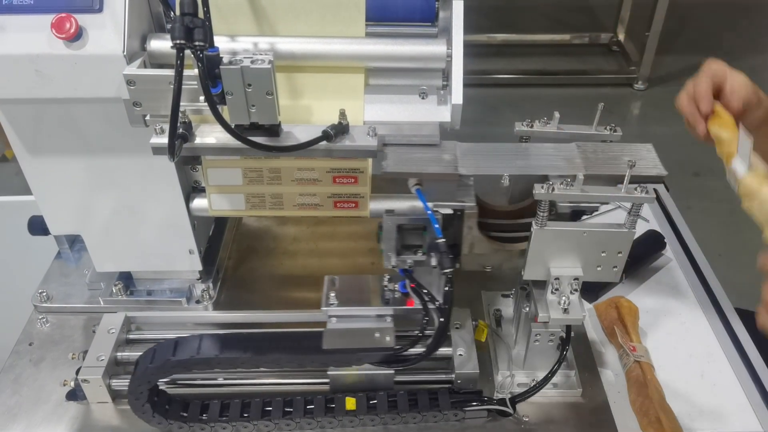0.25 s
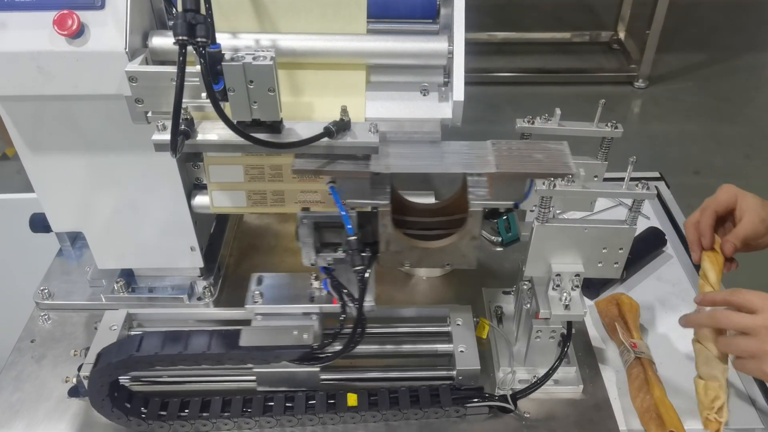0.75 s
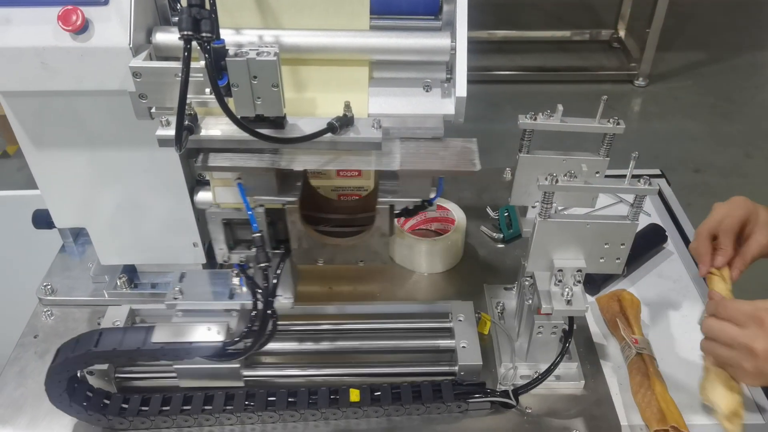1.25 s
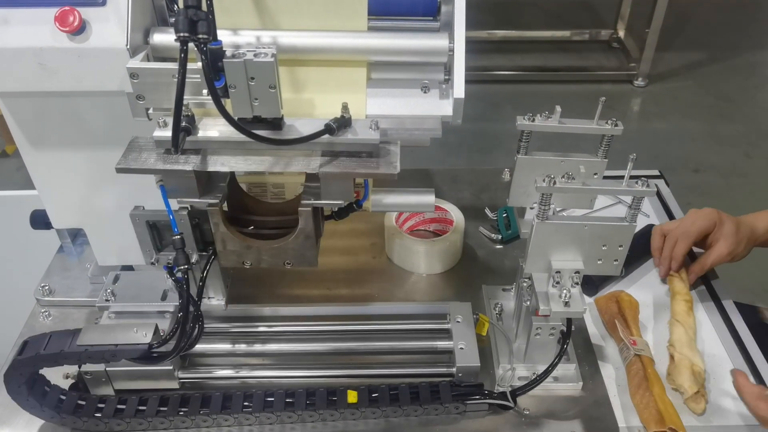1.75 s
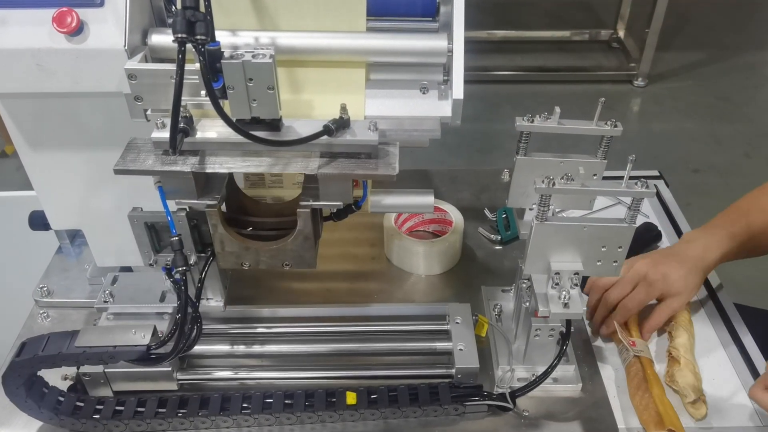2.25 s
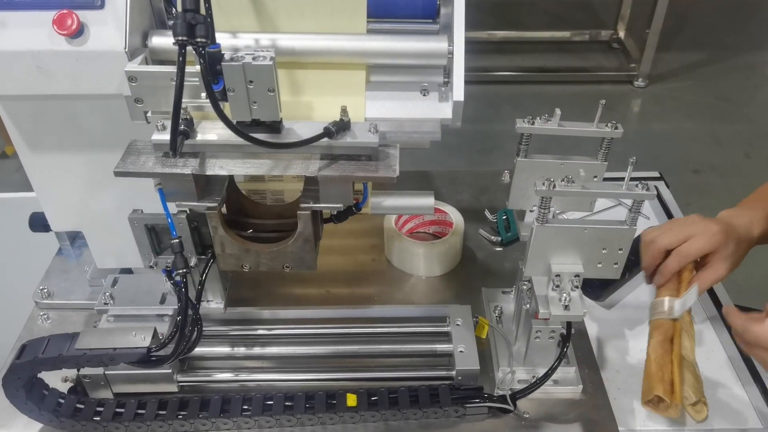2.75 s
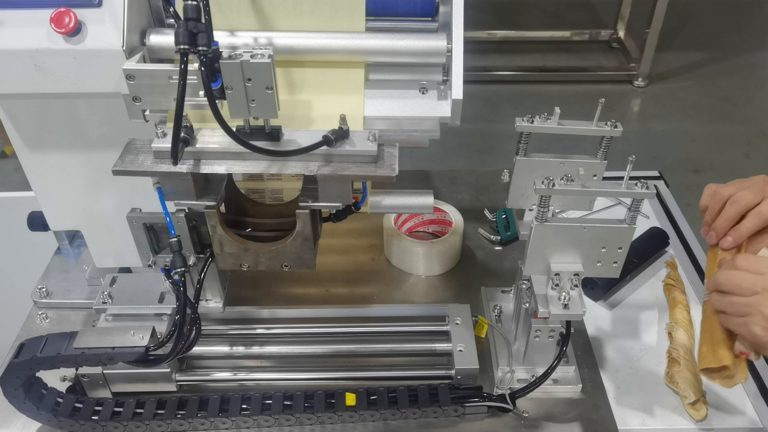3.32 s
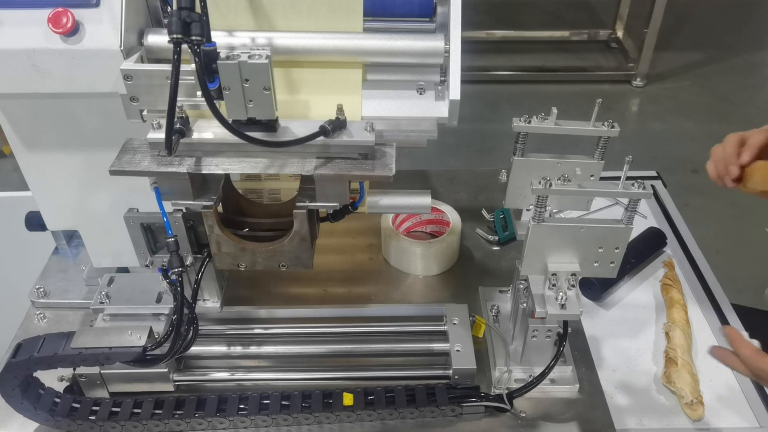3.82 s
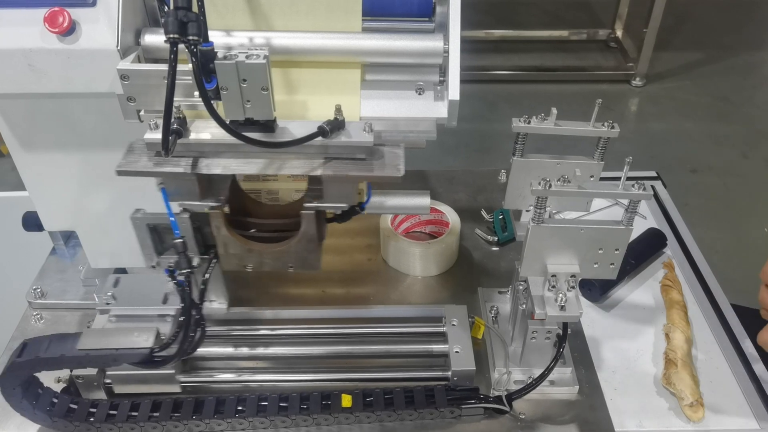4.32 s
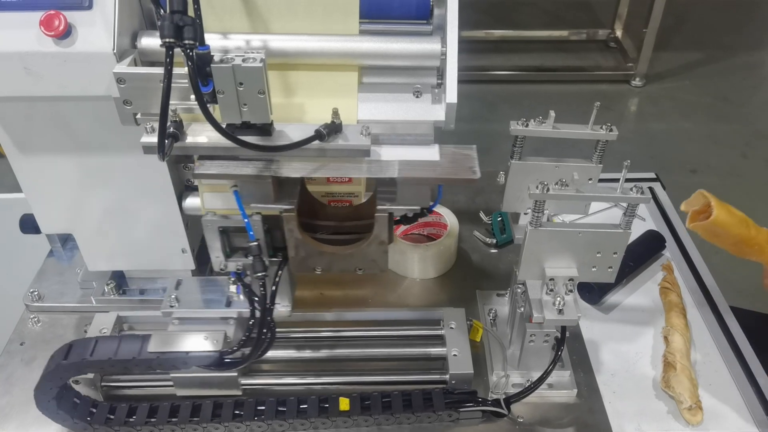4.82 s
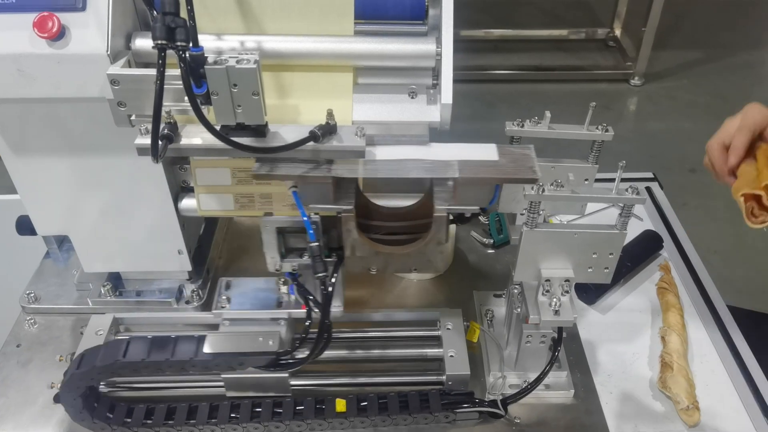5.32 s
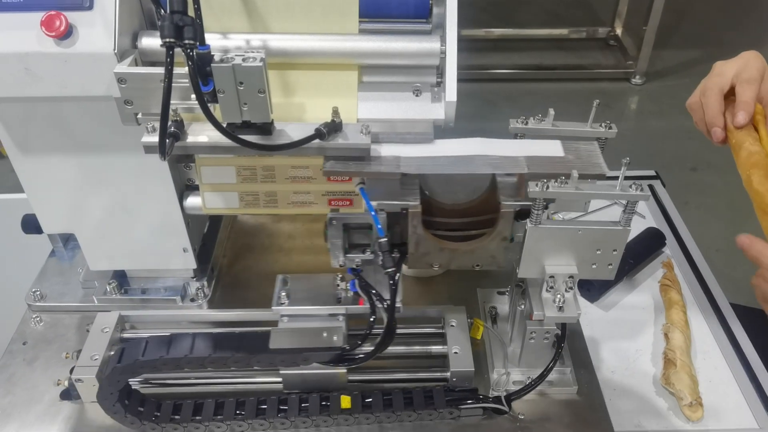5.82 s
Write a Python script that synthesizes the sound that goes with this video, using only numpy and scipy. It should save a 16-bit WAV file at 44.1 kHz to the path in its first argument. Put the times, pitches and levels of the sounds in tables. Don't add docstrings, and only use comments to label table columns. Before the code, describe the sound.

A small, close stereo microphone in a hard, echoing workshop hears steady low plant rumble and faint wavering drive whines. At 0 s a high metal ring around 5 kHz flutters away under a short fading hiss. Light chain clicks come at 0.55 and cluster near 0.9, with a thin puff. Valve snaps and puffs follow at 1.2 and 1.4. At 1.57 a cylinder slams with rattling after-knocks and a sharp snap; suction then hisses steadily until 2.78, with clicks around 1.84, 2.1, 2.35 and 2.45-2.57. At 2.78 a knock and hard snap open a bright, rough air jet, the loudest event, leaning left, while the background ducks. It shuts near 3.3 with a low thump; exhaust dies quickly, with soft knocks until 3.4. From 3.7 thin leak hiss continues to the 6 s end, with chain clicks near 3.8, 4.05-4.35, 5.0, 5.27 and 5.75 as background slowly rises.

```python
import sys
import numpy as np
from scipy import signal
from scipy.fft import rfft, irfft, next_fast_len
from scipy.io import wavfile
from scipy.ndimage import uniform_filter1d

SR = 44100
rng = np.random.default_rng(int(sys.argv[2]) if len(sys.argv) > 2 else 0)


def ratio_of_db(decibels):
    return 10 ** (np.asarray(decibels, float) / 20)


def unload_audio(sound):
    columns = np.transpose(np.atleast_2d(sound))
    steps = np.round(np.clip(columns, -1, 1) * 32767)
    wavfile.write(sys.argv[1], SR, steps.astype(np.int16))


N = 267687
SIZE = next_fast_len(N, True)
TIME_S = np.arange(N) / SR
HZ = np.fft.rfftfreq(SIZE, 1 / SR) + 1e-3


def at_hz(points, hz):
    points_hz, values = np.array(points).T
    return np.interp(np.log(hz), np.log(points_hz), values)


def lean(db):
    return ratio_of_db(np.multiply.outer([0.5, -0.5], db))


def since(s):
    return np.maximum(TIME_S - s, 0)


def gate(start_s, stop_s, attack_s, release_s):
    return np.interp(TIME_S, [start_s, start_s + attack_s, stop_s, stop_s + release_s], [0, 1, 1, 0])


def drift(rate):
    knots = rng.standard_normal(int(N / SR * rate * 2) + 3)
    path = np.interp(TIME_S * 2 * rate, np.arange(len(knots)), knots)
    return 1.16 * uniform_filter1d(path, size=SR // 200)


def band(x, low_hz, high_hz):
    return signal.sosfilt(signal.butter(2, [low_hz, high_hz], "band", fs=SR, output="sos"), x)


def colour(x, gain):
    return irfft(rfft(x, SIZE) * gain, SIZE)[..., :N]


def ring(push, hz, t60):
    r, w = ratio_of_db(-60 / (t60 * SR)), 2 * np.pi * hz / SR
    return signal.lfilter([0, np.sin(w)], [1, -2 * r * np.cos(w), r * r], push + 1e-18)


# pitch_hz, likeness (1 is the same)
LEFT_RIGHT_LIKENESS = [(30, .65), (60, 0.97), (350, 0.95), (900, 0.33), (1400, -0.00071), (2000, -0.044),
                       (2600, 0.2), (16000, -0.12)]


def spread(mid, side, hz):
    alike = np.clip(at_hz(LEFT_RIGHT_LIKENESS, hz), -1, 1)
    return np.sqrt(1 + alike) * mid + np.sqrt(1 - alike) * side * [[1], [-1]]


# left_ms, right_ms, gain (ratio)
PLATE_BOUNCES = [(0, 0.075, 0.75), (.11, 0.223, 0.28), (.42, 0.513, -0.26), (1.3, 0.85, -0.083),
                 (2.9, 3.8, 0.26), (5.2, 4.6, -0.37), (8.3, 9.1, 0.44), (13, 11.7, 0.29)]


def air(gain, level_band, flutter_db, rate, direct):
    mid, side, close = rfft(rng.standard_normal((3, SIZE))) * gain
    pair = spread(mid, side, HZ)
    paths = 0
    for left_ms, right_ms, bounce in PLATE_BOUNCES:
        delay_s = np.array([[left_ms], [right_ms]]) / 1000
        paths = paths + bounce * np.exp(-2j * np.pi * HZ * delay_s)
    alike = np.clip(at_hz(LEFT_RIGHT_LIKENESS, HZ), -1, 1)
    share = direct * (1 - np.abs(alike))
    pair = np.sqrt(1 - share) * pair + np.sqrt(share) * close * paths
    inside = (HZ > level_band[0]) & (HZ < level_band[1])
    pair = pair * SIZE / np.sqrt(2 * np.sum(np.abs(pair.mean(0)[inside]) ** 2))
    together = drift(rate)
    edges_hz = [20, 1200, 4200, 7000, 8600, 11000, 20000]
    out = 0
    for low, high in zip(edges_hz, edges_hz[1:]):
        part = irfft(pair * ((HZ > low) & (HZ <= high)), SIZE)[:, :N]
        out = out + part * ratio_of_db(flutter_db * (1.06 * together + 0.66 * drift(rate)))
    return out


# pitch_hz, t60_s
ROOM_DECAY = [(100, 1.07), (1000, 1.27), (5000, 1.7), (12000, 0.11)]


def room(x):
    t, tail = np.arange(SR) / SR, 0
    mid, side = rng.standard_normal((2, SR))
    for low in 60 * 2.0 ** np.arange(8):
        octave = band(spread(mid, side, 1.43 * low), low, 2 * low)
        tail = tail + octave * ratio_of_db(-60 * t / at_hz(ROOM_DECAY, 1.6 * low))
    tail = tail * (1 - np.exp(-t / 0.011)) / np.sqrt(SR / 20)
    return signal.fftconvolve(x[None], tail, axes=1)[:, :N]


JET_OPEN_S, JET_SHUT_S = 2.776, 3.297


def gain_db():
    before = np.minimum(-2.5 + 3 * since(0), 4)
    after = -7.5 + 3 * since(JET_OPEN_S + 1.21)
    ducked = np.clip(since(JET_OPEN_S) / 0.022, 0, 1)
    return before + (after - before) * ducked


# pitch_hz, level_db (per Hz)
SHOP_AIR = [(40, -42), (70, -8), (110, -2), (260, -6), (450, -12), (800, -19), (1300, -14.5), (1700, -16.5),
            (2100, -12), (3500, -16), (6500, -8), (8500, -8), (10500, -22.5), (13000, -79)]
# pitch_hz, width_hz, level_db (per Hz)
PLANT_DRONE = [(118.7, 4.3, 11), (132.6, 42, -15.5), (225.4, 11.6, -2.5), (302, 24, -15), (4490, 86, -8),
               (7080, 95, 0.5)]


def workshop():
    drone = sum(ratio_of_db(db) / (1 + (2 * (HZ - hz) / width) ** 2) for hz, width, db in PLANT_DRONE)
    spectrum = ratio_of_db(at_hz(SHOP_AIR, HZ)) + drone
    return ratio_of_db(-47.5) * air(spectrum, (40, 16000), flutter_db=0.7, rate=10, direct=0.41)


DRIVE_PITCH = [252.8, 1219.5, 1271.5, 1371.5, 1463.4, 1951.3, 2195.2, 2304.9, 2439.2, 2843.0]
# left_db, right_db, left_phase_lead_rad, waver_db
DRIVE_LEVEL = [(-60, -58.5, 0.6, -1.5), (-63, -67, -1.4, 6), (-64, -59.5, -2, 5), (-71, -49.5, -7.5, 6.5),
               (-60, -55.5, 0.5, -5), (-50.5, -53.5, -2.5, 9), (-58, -60.5, -1.5, -4), (-60, -66, -3, 5),
               (-67, -71, 4.5, -6.9), (-75, -61.5, 1.6, 0)]


def drives():
    out = np.zeros((2, N))
    for hz, (left_db, right_db, lead, waver_db) in zip(DRIVE_PITCH, DRIVE_LEVEL):
        waver = min(waver_db, 4) * np.tanh([drift(1.49), drift(1.545)])
        levels = ratio_of_db(np.array([[left_db], [right_db]]) + waver)
        phase = 2 * np.pi * hz * TIME_S + rng.uniform(0, 6.05) + 0.048 * drift(5.6)
        out += np.sqrt(2) * levels * np.sin(phase + np.array([[lead], [0]]))
    return out


# pitch_hz, level_db, t60_s
PLATE_TONES = [(4730, -52, 0.45), (5000, -43, 0.44), (4938, -45.5, 0.73), (4990, -47, .4), (5040, -43, .3)]


def plate():
    t, rings = TIME_S[:SR], 0
    for hz, db, t60 in PLATE_TONES:
        rings = rings + ratio_of_db(db - 60 * t / t60) * np.sin(2 * np.pi * hz * t + np.array([[1.5], [0]]))
    return np.pad(rings * ratio_of_db(3.5 * drift(45)[:SR]), ((0, 0), (0, N - SR)))


# pitch_hz, level_db (per Hz)
LEAK_SPECTRUM = [(290, -4), (500, -20.5), (1070, -19), (1410, -13.5), (1560, -16.5), (2560, -8.5),
                 (3900, -18), (6590, -7.5), (8450, 2.5), (10500, -11), (11800, -23.5), (13500, -30),
                 (15000, -37), (16300, -50)]


def leak():
    fade = np.clip(since(3.7) / 0.093, 0, 1)
    thin = ratio_of_db(at_hz(LEAK_SPECTRUM, HZ)) / (1 + (450 / HZ) ** 4)
    level = ratio_of_db(-36.5 + 0.91 * gain_db())
    return fade * level * air(thin, (5000, 11000), flutter_db=0.5, rate=36, direct=0.27)


# pitch_hz, level_db (per Hz)
SUCTION_SPECTRUM = [(240, -71), (400, -12.5), (627, -25.5), (1150, -16), (1400, -14.5), (1590, -16),
                    (2010, -11.5), (2870, -10), (3790, -16), (8350, 0), (9310, -2), (11600, -22.5),
                    (15300, -35), (16300, -46)]
# start_s, length_s, level_db, fall_db_per_s, extra_body_db (below about 5 kHz)
SUCTION_PUFFS = [
    (0, 0.38, -48.5, 60, 6.5),
    (.9, .27, -43, 78, -25),
    (1.175, 0.21, -34.5, 70, -14),
    (1.405, 0.16, -37.5, 4, -2.5),
    (1.574, 1.207, -33.5, -0.76, 1.4),
    (1.567, .035, -29.5, 300, -2.5),
    (1.6105, .15, -34, 57, 0),
    (1.808, 0.074, -43, 62, 3),
]


def suction():
    hiss = air(ratio_of_db(at_hz(SUCTION_SPECTRUM, HZ)), (5000, 11000), flutter_db=1.0, rate=35, direct=0.47)
    body = colour(hiss, 1 / (1 + (HZ / 5000) ** 6))
    top = colour(hiss, 1 / (1 + (11300 / HZ) ** 24))
    loose = TIME_S < 1.56
    hiss = hiss + (ratio_of_db(-10) - 1) * loose * top
    out = 0
    for s, length, db, fall_db, body_db in SUCTION_PUFFS:
        flow = gate(s, s + length, 0.002, 0.002) * ratio_of_db(db - fall_db * since(s))
        out = out + flow * (hiss + (ratio_of_db(body_db) - 1) * body)
    return out


def ticks(table, t60, steel):
    out, t = np.zeros((2, N + 4000)), np.arange(4000) / SR
    noise = rng.standard_normal((3, N + 4000))
    spits = 0.7 * (noise[0] + noise[1:])
    steel_shape = np.sin(np.pi * np.minimum(t / 0.0022, 1)) ** 2
    puff = (1 - np.exp(-t / 0.00076)) * ratio_of_db(-60 * t / t60)
    for s, db, pan_db, hz in table:
        at = slice(round(s * SR), round(s * SR) + 4000)
        burst = 0.79 * puff * spits[:, at] + steel * steel_shape * np.sin(2 * np.pi * hz * t)
        out[:, at] += ratio_of_db(db) * lean(pan_db)[:, None] * band(burst, 4640, 10000)
    return band(band(out[:, :N], 3900, 11200), 5300, 13300)


# start_s, level_db (peak), left_minus_right_db, pitch_hz
CHAIN_LINKS = [(0.5439, -27.5, 3, 7200), (0.587, -35, -1.1, 8200), (0.6006, -29, 5, 9300),
               (0.843, -38, 1.1, 6900), (0.8757, -24.5, 2.1, 9100), (0.877, -32, 0, 5250),
               (0.891, -23, 4, 9200), (0.9032, -22, 5.5, 9400), (0.908, -16, 3, 8900),
               (0.912, -28, 0, 5250), (0.9167, -27, -1.1, 7350), (1.0977, -28, -1.1, 6300),
               (3.7774, -24.5, -2.5, 8640), (4.0541, -18, 5, 7650), (4.0626, -24, 1.1, 7960),
               (4.109, -29, 1.1, 8900), (4.1963, -27, 0, 8300), (4.2027, -21, -1.5, 8800),
               (4.211, -16.5, 0, 7370), (4.3442, -24, -3, 8200), (4.974, -18.5, 1.1, 8440),
               (4.9794, -18, 1.1, 7900), (4.99, -23, 0, 8600), (5.2724, -14.5, 2, 9400),
               (5.7386, -19, 3, 8500), (5.7455, -22, 4, 8200), (5.7495, -29, 0, 8500)]


def cable_chain():
    return ticks(CHAIN_LINKS, t60=0.025, steel=0.49)


# start_s, level_db (peak), left_minus_right_db, pitch_hz
VALVE_CLICKS = [(1.1822, -10.5, 3, 8600), (1.1906, -24, -4, 8660), (1.2144, -14.5, 6, 8400),
                (1.2256, -21, -0.6, 8600), (1.236, -22, -2.5, 7960), (1.4071, -25, -9.5, 8600),
                (1.5396, -28, -3.5, 6930), (1.5737, -14.5, -11, 6920), (1.579, -16, -1, 8260),
                (1.6107, -6.5, -4, 10250), (1.8395, -12.5, 5, 9000), (2.092, -20, -2, 8100),
                (2.102, -19, 0, 8600), (2.118, -20, 0, 9000), (2.343, -19, -5, 7790),
                (2.4404, -11.5, 0, 7360), (2.448, -20, -3.5, 8070), (2.5258, -13, 4, 7730),
                (2.5471, -7.5, 8, 8300), (2.572, -15.5, 0, 8500), (2.81, -1, -9, 9500)]


def valves():
    return ticks(VALVE_CLICKS, t60=0.022, steel=0.78)


# pitch_hz, level_db, t60_s
FRAME_TONES = [(131.5, 0.8, 0.15), (252, 3, 0.03), (319, 1.5, 0.037), (424, 5.5, 0.12), (520, -29, 0.021),
               (740, 3, 0.027), (782, -3, 0.05), (1150, 2.5, 0.078), (1900, -4, .03)]
# start_s, level_db (peak), contact_cut_hz, crunch_db, room_db
CYLINDER_KNOCKS = [(1.57, -16, 790, 3.5, 1.5), (1.583, -27.5, 710, 12, 5.5), (1.6, -30, 700, 7, 5.5),
                   (1.633, -22, 500, 3, 3), (1.653, -25, 503, 7, 2), (1.673, -25.5, 500, 1.1, 0),
                   (1.82, -22.5, 235, 11.5, -1.5), (2.7723, -20.5, 500, 6, -7),
                   (2.809, -19.5, 890, 6.5, -5.5), (3.277, -11, 380, -1, -8), (3.35, -21.5, 406, -23, -2.2),
                   (3.404, -15.5, 261, 2, -12)]


def cylinder():
    dry, send, t = np.zeros(N), np.zeros(N), np.arange(SR // 2) / SR
    for s, db, cut_hz, crunch_db, room_db in CYLINDER_KNOCKS:
        cut = 2 * np.pi * cut_hz
        push = t * np.exp(-cut * t) * cut ** 2 / SR
        modes = 0
        for hz, mode_db, t60 in FRAME_TONES:
            modes = modes + ratio_of_db(mode_db + 2 * rng.standard_normal()) * ring(push, hz, t60)
        grit = band(rng.standard_normal(SR // 2), 0.47 * cut_hz, 1.49 * cut_hz)
        crunch = grit * (1 - np.exp(-t / 0.0054)) * ratio_of_db(-60 * t / 0.12)
        knock = ratio_of_db(db) * band(ratio_of_db(-10.5) * modes + ratio_of_db(crunch_db) * crunch, 142, 3600)
        dry[round(s * SR):][:SR // 2] += knock
        send[round(s * SR):][:SR // 2] += ratio_of_db(room_db) * knock
    return dry, send


# pitch_hz, level_db (per Hz)
VENT_SPECTRUM = [(290, -51), (500, -35.5), (1310, -30.5), (2340, -18), (2790, -20), (4000, -18),
                 (4900, -11), (5780, -5), (6890, -11.5), (8450, -1.5), (10800, -20.5), (11600, -43),
                 (13500, -45), (16300, -79)]


def vent():
    open_s, hold_s, fall_db_per_s = 3.283, 0.035, 39.5
    opening = np.clip(since(open_s) / 0.0044, 0, 1)
    pressure = opening * ratio_of_db(-18.5 - fall_db_per_s * since(open_s + hold_s))
    return pressure * air(ratio_of_db(at_hz(VENT_SPECTRUM, HZ)), (4500, 11000), flutter_db=1.0, rate=25, direct=0.21)


# pitch_hz, level_db (per Hz)
JET_SPECTRUM = [(88, -32), (150, -30), (1300, -32), (1400, -30.5), (1640, -23.5), (3460, -23.5),
                (4300, -19.5), (4620, -35), (4850, -16), (5120, -15.5), (7880, 0), (9030, 0.5),
                (11700, -19), (13100, -22), (15300, -22), (16300, -62)]
# pitch_hz, left_minus_right_db
JET_LEFT_RIGHT = [(300, 12), (2000, 3.5), (3000, 4), (6500, -0.5), (7400, 2), (8000, -0.5), (9200, 6.5),
                  (10200, 1)]


def jet():
    surge_s, rest_s = 0.028, 0.12
    blowing, resting = since(JET_OPEN_S), since(JET_SHUT_S)
    shut = np.clip(resting / 0.0091, 0, 1)
    kick_db = 4 * np.exp(-blowing / 0.028)
    surge_db = 2 * np.clip(since(JET_SHUT_S - surge_s) / surge_s, 0, 1) * (1 - shut)
    rest_db = -7 * shut - 40 * resting
    db = -16.5 + kick_db + surge_db + rest_db
    top_db = (6.5 - 21 * np.exp(-blowing / 0.033)) * (1 - shut)
    flow = air(ratio_of_db(at_hz(JET_SPECTRUM, HZ)), (5000, 11000), flutter_db=0.62, rate=35, direct=0.25)
    flow = colour(flow, lean(at_hz(JET_LEFT_RIGHT, HZ))) * ratio_of_db(0.53 * drift(300))
    top = colour(flow, 1 / (1 + (10800 / HZ) ** 16))
    flow = flow + ratio_of_db(6.5) * np.exp(-blowing / 0.1) * band(flow, 3430, 4440)
    opening = gate(JET_OPEN_S, JET_SHUT_S + rest_s, 0.0072, 0.088)
    return opening * ratio_of_db(db) * (flow + (ratio_of_db(top_db) - 1) * top)


def scene():
    background = ratio_of_db(gain_db()) * (workshop() + drives())
    tick = cable_chain() + valves()
    knock, knock_send = cylinder()
    hits = tick + ratio_of_db(gain_db()) * knock + room(ratio_of_db(-6.5) * tick.mean(0) + knock_send)
    return background + plate() + leak() + suction() + hits + vent() + jet()


def band_limit(x):
    return signal.sosfilt(signal.butter(12, 16320, fs=SR, output="sos"), x)


# pitch_hz, left_minus_right_db
MICROPHONE_PORTS = [(800, 0), (2500, -3.5), (5800, -2), (7000, -4.5), (7900, -8), (8600, -4), (9200, 3.5),
                    (10200, -0.5), (11500, -1), (13500, -15.5), (16000, 13)]


def record(dry):
    x = colour(dry, lean(at_hz(MICROPHONE_PORTS, HZ)))
    x = signal.sosfilt(signal.butter(3, 68, "high", fs=SR, output="sos"), x)
    x = 0.92 * np.tanh(x / 0.92)
    x = colour(x, HZ < 16250)
    return band_limit(x)


dry = scene()
out = record(dry)
unload_audio(out)
```